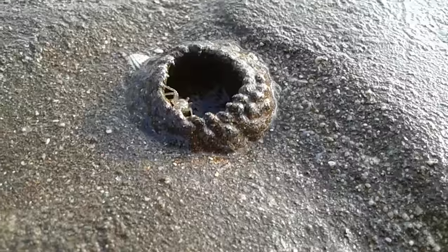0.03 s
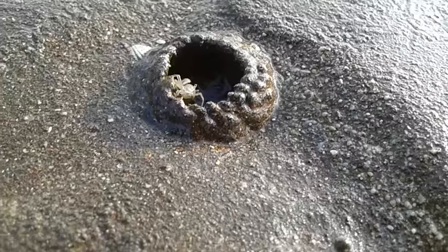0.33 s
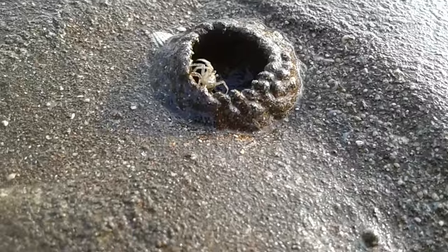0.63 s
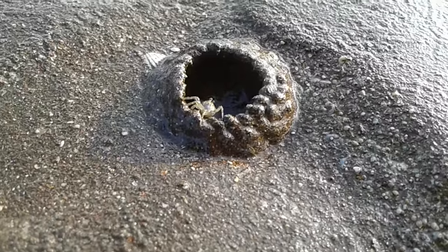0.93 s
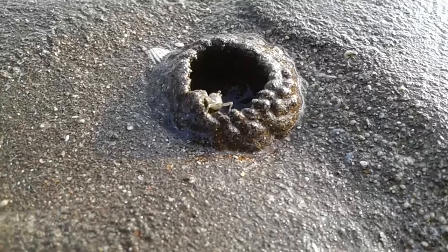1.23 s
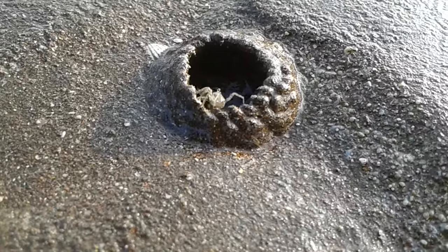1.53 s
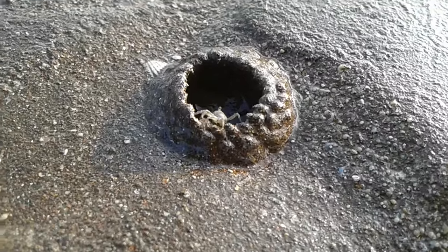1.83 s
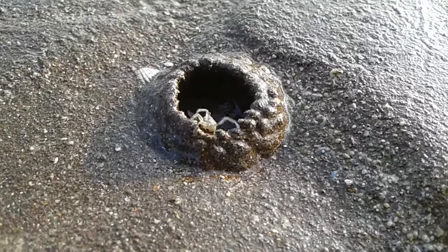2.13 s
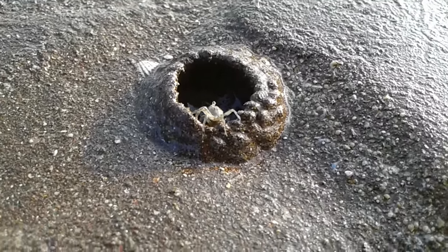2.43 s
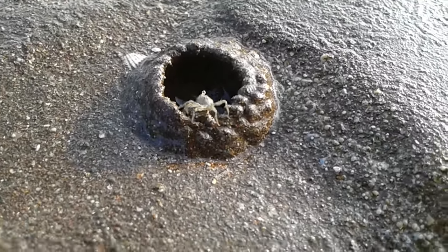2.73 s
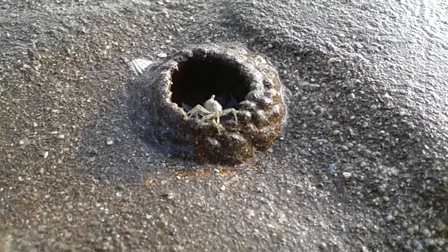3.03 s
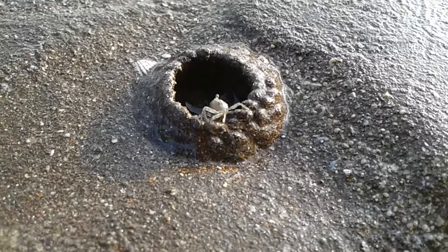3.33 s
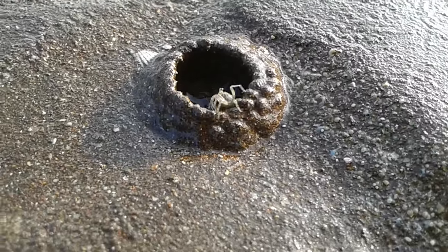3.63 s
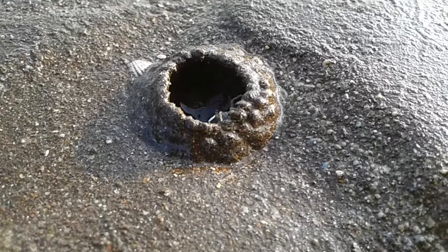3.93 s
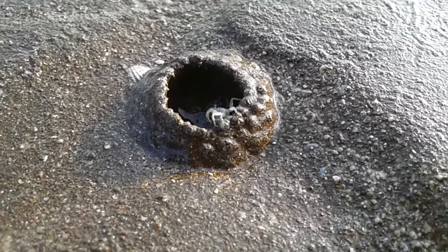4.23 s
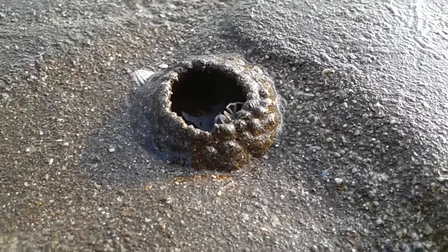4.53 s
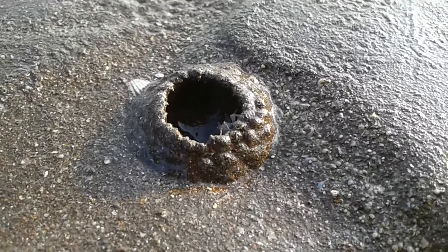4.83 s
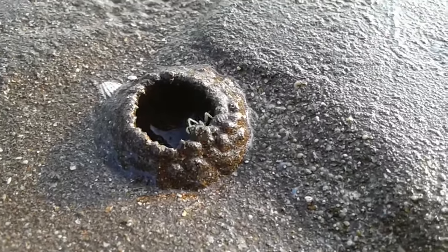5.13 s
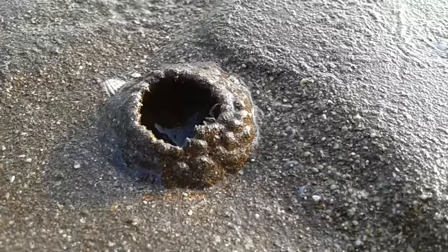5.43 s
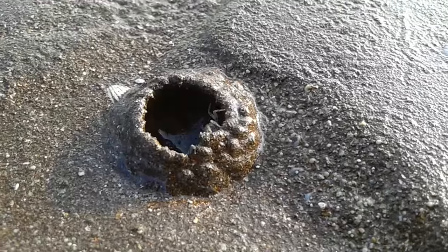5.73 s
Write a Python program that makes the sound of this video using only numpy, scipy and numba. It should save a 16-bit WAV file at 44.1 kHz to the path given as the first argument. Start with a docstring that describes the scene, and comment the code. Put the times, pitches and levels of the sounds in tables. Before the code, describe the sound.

Gusty wind rumbles and buffets on the microphone over the faint, steady roar and hiss of distant waves on a beach.

```python
"""Wind on a small camera microphone held low over wet sand, with surf breaking far down the beach.
A breeze rumbles on the microphone port; gusts ride on it and throw sharp buffets at their strongest,
with small eddies sputtering in between and thin whistles above. Far off, the waves roar steadily and
their foam hisses; close by, the sand sizzles twice. The camera's gain control turns everything down
after the big gusts and lets it come back half a second later."""
import sys
import numpy as np
from scipy import signal
from scipy.fft import rfft, irfft
from scipy.io import wavfile
from scipy.ndimage import uniform_filter1d, minimum_filter1d, map_coordinates
from numba import njit

SR = 44100
rng = np.random.default_rng(int(sys.argv[2]) if len(sys.argv) > 2 else 0)


def master_out(mix):
    """Clip the mix to full scale and print it as 16-bit PCM to the path in sys.argv[1]."""
    frames = np.transpose(np.atleast_2d(mix))
    ceiling = np.clip(frames, -1, 1)
    pcm = np.round(ceiling * 32767).astype(np.int16)
    wavfile.write(sys.argv[1], SR, pcm)


N = 254456
TIME = np.arange(N) / SR
FREQS = np.arange(N // 2 + 1) * SR / N


def undb(db):
    """Decibels to gain."""
    return 10 ** (np.asarray(db) / 20)


def level_curve(points):
    """Gain at every sample from (t/s, level/dB) points."""
    return undb(np.interp(TIME, *np.transpose(points)))


def unit(x):
    """Scale to rms 1."""
    return x / np.sqrt(np.mean(x ** 2))


def noise(spectrum):
    """Noise of rms 1 with the colour of (f/Hz, level/dB) points."""
    hz, db = np.transpose(spectrum)
    colour = undb(np.interp(np.log(np.maximum(FREQS, 1)), np.log(hz), db))
    return unit(irfft(rfft(rng.standard_normal(N)) * colour, N))


def wander(per_s):
    """Smooth random wander of rms 1 that changes about per_s times a second."""
    steps = rng.standard_normal(4096)
    return unit(map_coordinates(steps, [TIME * per_s], order=2, mode="wrap"))


def steady(x, samples):
    """Take out swells longer than this many samples and keep the fast grain."""
    power = uniform_filter1d(uniform_filter1d(x ** 2, samples), samples)
    return x / np.sqrt(power + 1e-12)


# The breeze at the microphone, low over the sand: t/s, rumble level/dB
BREEZE_LEVEL = [(0.41, -22.5), (0.58, -24.5), (0.65, -19), (0.85, -21.5), (1.14, -12.5), (1.38, -13.5),
                (1.7, -14.5), (1.84, -22), (2.15, -20.5), (2.23, -22), (2.47, -17.5), (2.9, -18.5),
                (3.15, -20), (3.56, -20), (3.98, -16), (4.12, -20.5), (4.78, -17), (5.77, -19.5)]
# Gusts reaching the microphone: t/s, length/s, rumble level/dB, flutter level/dB
PORT_GUSTS = [(0.535, 0.031, -17.5, -35), (0.884, .085, -13.5, -27), (0.967, 0.15, -9.5, -9.5),
              (1.195, .11, -6.5, -9.5), (1.433, 0.083, -14, -14), (1.559, 0.048, -18, -14),
              (1.624, .04, -11.5, -17), (1.748, 0.059, -12.5, -20), (1.867, 0.074, -15, -28),
              (2.045, 0.076, -17.5, -23.5), (2.281, 0.073, -12.5, -14), (2.391, 0.034, -11.5, -22.5),
              (2.61, 0.13, -16.5, -22), (2.682, 0.15, -12.5, -15.5), (2.79, 0.042, -10, -12),
              (3.246, 0.074, -13.5, -28), (3.401, 0.057, -13, -25), (3.611, .07, -17, -22),
              (3.739, 0.091, -15.5, -22), (3.849, 0.12, -15, -23), (4.442, 0.12, -14, -24.5),
              (4.526, 0.084, -13.5, -16.5), (4.605, 0.11, -10.5, -13.5), (4.695, 0.11, -13, -20),
              (4.89, 0.042, -13.5, -26), (5.034, 0.066, -15, -21.5), (5.133, 0.18, -14, -29),
              (5.321, 0.1, -13, -31.5), (5.443, 0.049, -13.5, -21), (5.571, 0.077, -12, -31.5),
              (5.681, 0.079, -15, -20)]
def airflow(calm_flutter_db=-17, attack_s=.01, release_s=.034):
    """Strength of the large and the small eddies: gusts rise out of the breeze, hold and drop back."""
    rumble = level_curve(BREEZE_LEVEL)
    flutter = rumble * undb(calm_flutter_db)
    for start, length, rumble_db, flutter_db in PORT_GUSTS:
        rise = (TIME - start) / attack_s
        fall = (start + length - TIME) / release_s
        gust = np.clip(.5 + np.minimum(rise, fall), 0, 1)
        rumble = np.maximum(rumble, gust * undb(rumble_db))
        flutter = np.maximum(flutter, gust * undb(flutter_db))
    return rumble, flutter


# Spectra of the large, small and finest eddies, right on the port: f/Hz, relative level/dB
RUMBLE_SPECTRUM = [(15, -35), (26, -24), (38, -41), (60, -9.5), (95, -1), (135, 0), (200, 0), (300, -5),
                   (420, -12), (600, -27.5), (1000, -58), (2500, -91)]
FLUTTER_SPECTRUM = [(100, -38), (220, -16), (350, -3), (480, -0.5), (650, -6.5), (850, -13), (1100, -21.5),
                    (1600, -45), (2500, -49), (5000, -78)]
CRACKLE_SPECTRUM = [(300, -21), (650, 6.5), (850, 9), (1200, -1.5), (1700, -9), (2500, -18), (4000, -52),
                    (8000, -79)]
def wind(flutter_db=-1.5, crackle_db=-6.5, surge_db=1.43, churn_db=2.0, burst_db=3.0):
    """Large eddies rumble on the port; small ones ride on them in bursts and crackle in fast air."""
    rumble, flutter = airflow()
    surge = undb(surge_db * wander(40))
    flutter = flutter * surge ** 2.15
    crackle = flutter ** 1.69  # the finest eddies grow faster with speed than the rest
    eddies = wander(110)
    bursts = undb(burst_db * (eddies + wander(260)))
    large = steady(noise(RUMBLE_SPECTRUM) * undb(churn_db * eddies), samples=1500)
    small = steady(noise(FLUTTER_SPECTRUM) * bursts, samples=1200)
    finest = steady(noise(CRACKLE_SPECTRUM) * bursts, samples=1200)
    return (rumble * surge * large
            + undb(flutter_db) * flutter * small
            + undb(crackle_db) * crackle * finest)


def eddy_spectrum(f, reach_hz, low_hz=220):
    """An eddy's pressure spectrum dies away exponentially, reaching further up for a fast eddy."""
    return f ** 2 / (f ** 2 + low_hz ** 2) * np.exp(-f / reach_hz)


def sputter(per_s=26, above_rumble_db=6, scatter_db=2.0, slots=512):
    """Small eddies tap the port at random, harder when the wind is stronger."""
    at = ((np.arange(slots) + rng.random(slots)) / per_s * SR).astype(int)
    sizes = undb(scatter_db * rng.standard_normal(slots))
    signs = rng.choice([-1, 1], slots)
    taps = np.zeros(N)
    taps[at[at < N]] = (signs * sizes)[at < N]
    rumble, _ = airflow()
    swing = 1j * eddy_spectrum(FREQS, reach_hz=210)  # one push and pull
    swing /= np.abs(irfft(swing, N)).max()
    return undb(above_rumble_db) * irfft(rfft(taps * rumble) * swing, N)


# Spectra of the breakers, foam and spray, far down the beach: f/Hz, relative level/dB
BREAKER_SPECTRUM = [(60, 8), (200, 5), (450, -5.5), (700, -1), (950, -3.5), (1120, -5.5), (1280, -2.5),
                    (1500, -6.5), (1850, -7), (2400, -14.5), (3200, -24), (5000, -37), (9000, -64)]
FOAM_SPECTRUM = [(900, -26), (2000, -3), (3100, 4), (3800, 0.5), (5000, 0), (5700, -0.5), (6150, 1.5),
                 (6700, -2.5), (7400, -6.5), (8300, -14.5), (10000, -29), (15000, -39)]
SPRAY_SPECTRUM = [(5000, -27), (7500, 2), (9000, 2.5), (10500, 0), (12000, -4), (15000, -5)]
# Foam spreading and draining on the beach: t/s, relative level/dB
FOAM_WASH = [(0.41, -41), (0.54, -40), (0.6, -44.5), (0.9, -42.5), (1.5, -45), (2.45, -42.5), (2.9, -44),
             (3.1, -44.5), (3.45, -45), (3.8, -44.5), (4.0, -44.5), (5.0, -47), (5.77, -46.5)]
def surf(roar_db=-27.5, foam_db=1.5, spray_db=-58.5, ripple_db=.17, patchy_db=1.06, grain_db=1.05):
    """Distant breakers roar; foam patches swell and fade, each at its own pitch, under a fine spray."""
    roar = noise(BREAKER_SPECTRUM) * undb(roar_db + ripple_db * wander(16))
    bubbles = rfft(noise(FOAM_SPECTRUM))
    octave = np.log2(np.maximum(FREQS, 1))
    centres = np.linspace(np.log2(2000), np.log2(9000), 14)
    patches = [irfft(bubbles * np.interp(octave, centres, share), N) for share in np.eye(len(centres))]
    foam = unit(sum(patch * undb(patchy_db * wander(17)) for patch in patches))
    spray = undb(spray_db) * noise(SPRAY_SPECTRUM)
    hiss = undb(foam_db) * level_curve(FOAM_WASH) * foam + spray
    return roar + undb(grain_db * wander(420)) * hiss


# Sizzles on the wet sand, close to the microphone: t/s, level/dB, decay/s
SAND_SIZZLES = [(0.513, -43, .012), (1.932, -43.5, 0.03)]
def sizzles(rise_s=.004):
    """Tiny bubbles burst together: a quick, very high hiss that dies away."""
    swell = np.zeros(N)
    for start, db, decay_s in SAND_SIZZLES:
        age = TIME - start
        swell += undb(db) * np.clip(age / rise_s, 0, 1) * np.exp(-np.abs(age) / decay_s)
    return swell * noise([(3000, -20), (7500, 6), (12000, -6), (15000, -10)])


# Thin, airy whistles of the wind on the beach: t/s, length/s, first f/Hz, last f/Hz, level/dB
EDGE_WHISTLES = [(0.6, 0.45, 3130, 3060, -48), (0.79, 0.099, 7400, 6900, -48),
                 (0.93, 0.28, 6570, 6000, -47), (2.48, 0.27, 4860, 5250, -53),
                 (2.83, 0.04, 3050, 3100, -40), (2.86, .11, 4200, 4620, -49), (3.27, 0.18, 5630, 5500, -52),
                 (3.655, 0.2, 3920, 4210, -48), (4.13, .07, 7300, 7600, -54)]
def whistles(relative_width=.065, waver_db=2.0):
    """Air sheds vortices at small edges: narrow, wavering bands that glide with its speed."""
    out = np.zeros(N)
    for start, length, first_hz, last_hz, db in EDGE_WHISTLES:
        span = (TIME > start) & (TIME < start + length)
        progress = (TIME[span] - start) / length
        phase = 2 * np.pi * np.cumsum(first_hz + (last_hz - first_hz) * progress) / SR
        blur = signal.butter(2, relative_width * first_hz / 2, fs=SR, output="sos")
        drift = signal.sosfilt(blur, rng.standard_normal((2, SR)))[:, :len(phase)]
        band = unit(drift[0] * np.cos(phase) + drift[1] * np.sin(phase))
        swell = np.sqrt(np.sin(np.pi * progress))
        out[span] += undb(db) * swell * band
    return out * undb(waver_db * wander(40))


# The hardest eddies, straight onto the port: t/s, relative peak level/dB, spectral reach f/Hz
PORT_BUFFETS = [(0.889, -6, 220), (0.973, 5.5, 563), (1.013, 11.5, 470), (1.063, 5.5, 460), (1.083, 4, 524),
                (1.12, 1, 400), (1.175, 5, 260), (1.214, 9, 370), (1.252, 11, 530), (1.266, 8, 480),
                (1.445, -3.5, 564), (2.042, -4, 232), (2.304, -9.5, 260), (2.696, 3.5, 266),
                (2.747, 1, 260), (2.791, 7, 380), (2.806, 6, 600), (2.823, -1, 380), (3.619, -2.5, 300),
                (3.663, -2.5, 219), (3.82, -4, 240), (3.86, 2, 205), (3.91, 4, 192), (4.578, -2.5, 424),
                (4.603, 7.5, 320), (4.656, 4, 490), (4.769, -0.5, 308), (4.909, -3, 270), (5.048, -3, 222),
                (5.277, -6, 260), (5.352, 2, 350), (5.461, -3, 300), (5.712, -5, 300)]
def buffets(gain_db=-.94, rise_s=.0012, lead_s=.012, samples=2048):
    """An eddy strikes the port: a few wild pressure swings, brighter the faster it moves."""
    out = np.zeros(N)
    age = np.maximum(np.arange(samples) / SR - lead_s, 0)
    f = np.arange(samples // 2 + 1) * SR / samples
    soft_ends = signal.windows.tukey(samples, .4)
    for start, db, reach_hz in PORT_BUFFETS:
        # the swirl scatters the blow over a few milliseconds
        swirl = rng.standard_normal(samples) * (age / rise_s) ** 2 * np.exp(-2 * age / rise_s)
        scatter = np.exp(1j * np.angle(rfft(swirl)))
        blow = soft_ends * irfft(eddy_spectrum(f, reach_hz) * scatter)
        blow *= undb(db + gain_db) / np.abs(blow).max()
        at = int((start - lead_s) * SR)
        out[at:at + samples] += blow[:N - at]
    return out


def scene():
    """One microphone low over the sand: wind right on it, the surf far behind."""
    return (wind() + sputter() + buffets() + whistles() + surf() + sizzles())[None]


@njit
def peak_follower(x, release_s):
    """Jumps to each peak and sinks back slowly."""
    out, level = np.empty(len(x)), 0.
    for i in range(len(x)):
        level = max(abs(x[i]), level * (1 - 1 / (release_s * SR)))
        out[i] = level
    return out


def gain_control(x, threshold_db=-11.0, slope=.58, sense_s=.09, hold_s=.47, recover_s=.17):
    """The camera's gain drops when the running level passes a threshold, is held, then recovers."""
    running = np.sqrt(np.maximum(uniform_filter1d(x ** 2, int(sense_s * SR)), 0))
    half = int(hold_s * SR / 2)
    held = -minimum_filter1d(-running, 2 * half + 1, origin=half, mode="constant")
    excess = peak_follower(held, recover_s) / undb(threshold_db)
    return np.maximum(excess, 1) ** -slope


def limiter(x, ceiling=.97, release_s=.053):
    """Gain that ducks smoothly just ahead of the hardest peaks."""
    gain = np.minimum(1, ceiling / (peak_follower(x, release_s) + 1e-9))
    held = minimum_filter1d(gain, size=129)
    return uniform_filter1d(uniform_filter1d(held, size=65), size=65)


def record(dry, low_cut_hz=40, top_hz=15050, start_s=.402):
    """The camera, silent until start_s: bass cut at the microphone, gain control, limiter, top cut."""
    low_cut = signal.butter(4, low_cut_hz, "high", fs=SR, output="sos")
    top_cut = signal.ellip(10, .2, 80, top_hz, fs=SR, output="sos")
    sound = signal.sosfilt(low_cut, dry)
    sound *= gain_control(sound[0])
    sound *= limiter(sound[0])
    gate = np.interp(np.arange(N), [start_s * SR, start_s * SR + 30, N - 130, N - 1], [0, 1, 1, 0])
    return signal.sosfilt(top_cut, sound * gate)


dry = scene()
out = record(dry)
master_out(out)
```